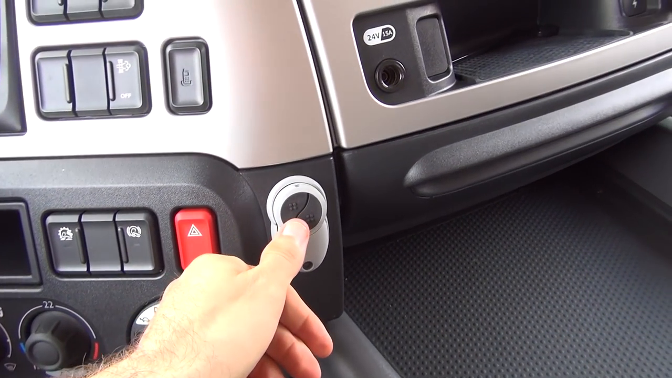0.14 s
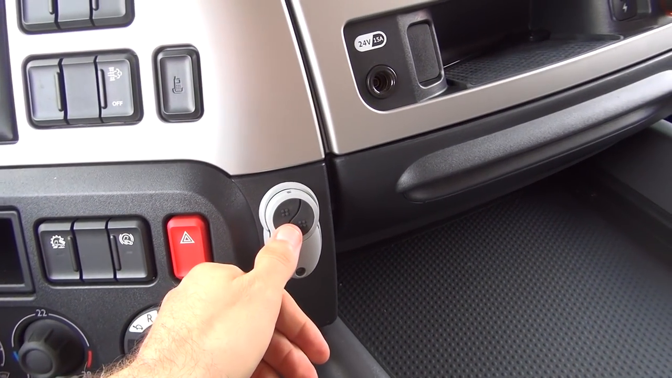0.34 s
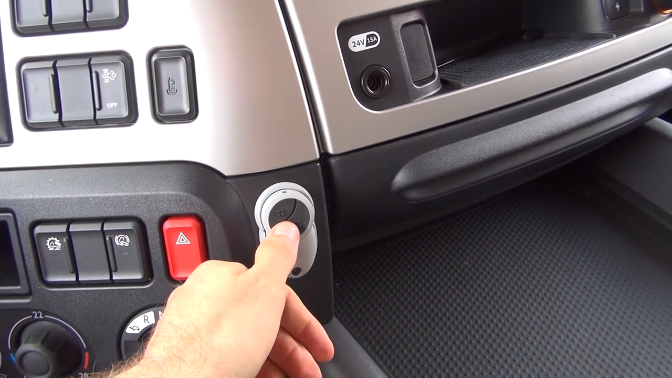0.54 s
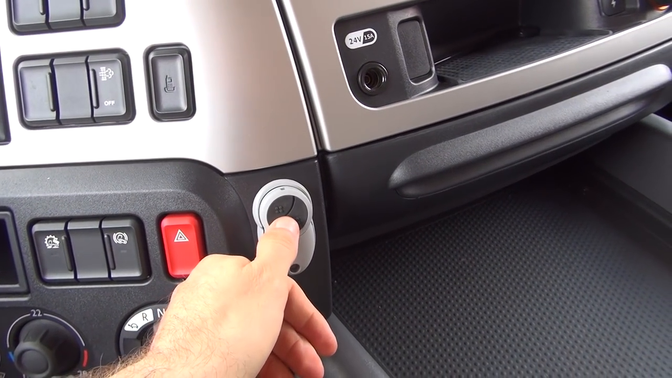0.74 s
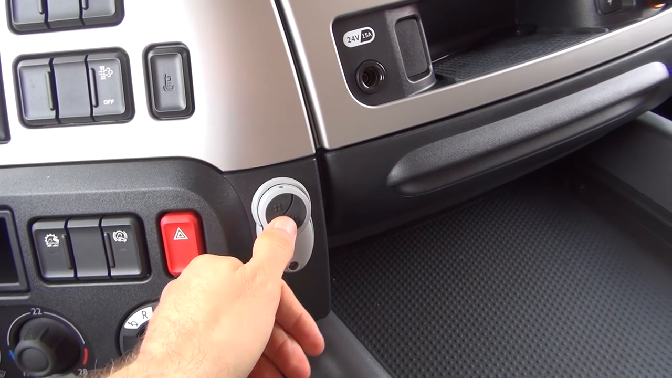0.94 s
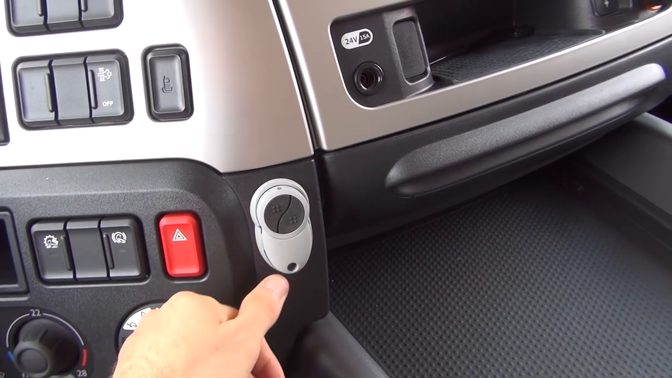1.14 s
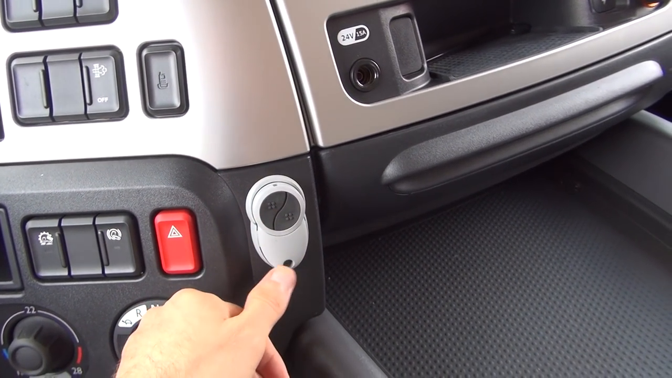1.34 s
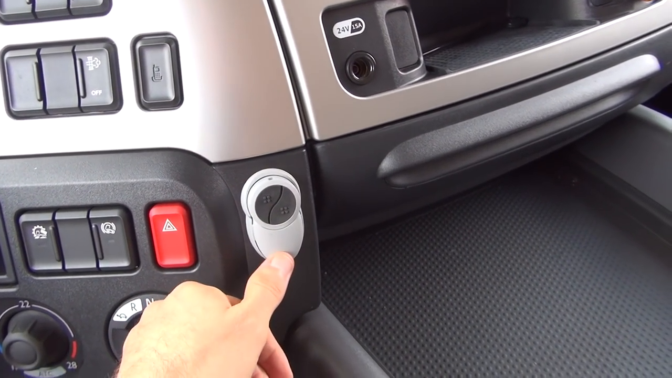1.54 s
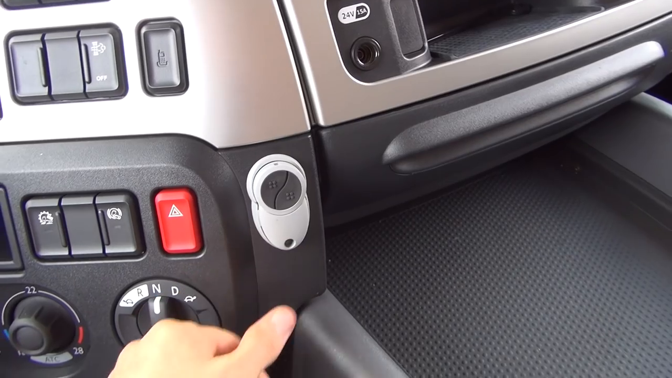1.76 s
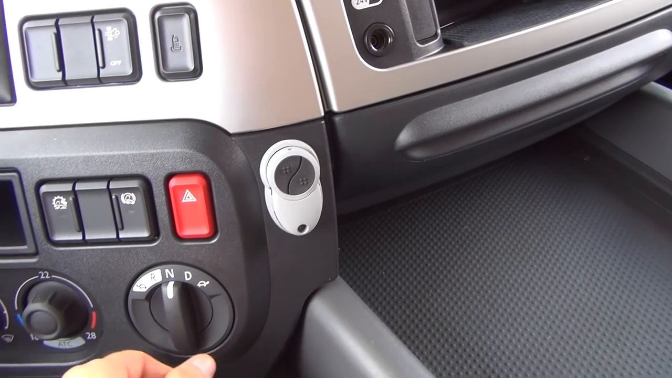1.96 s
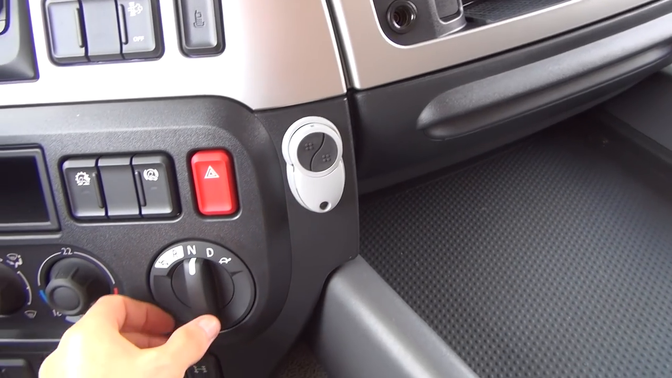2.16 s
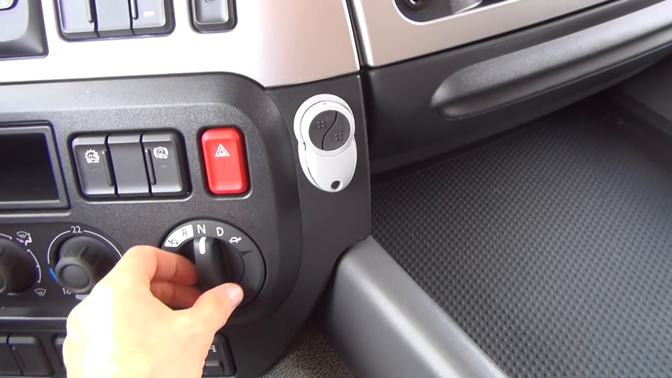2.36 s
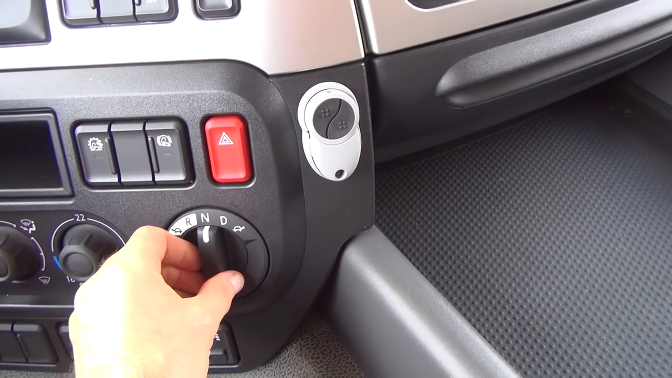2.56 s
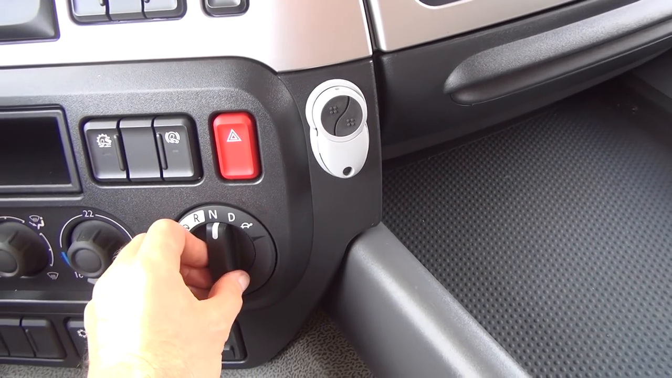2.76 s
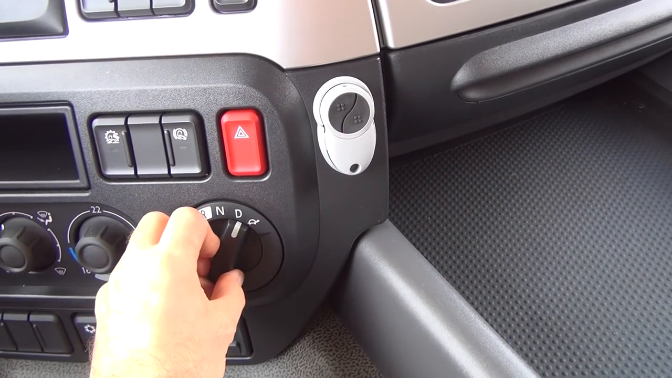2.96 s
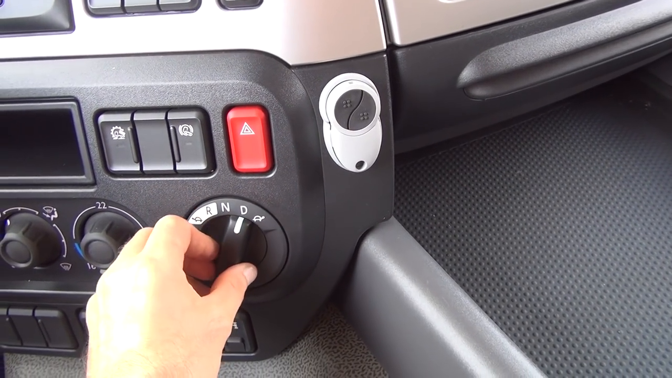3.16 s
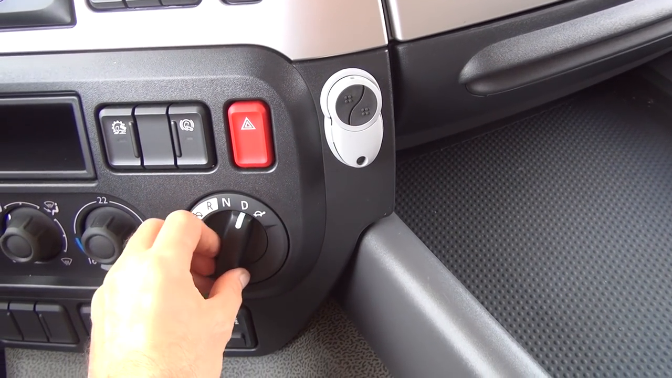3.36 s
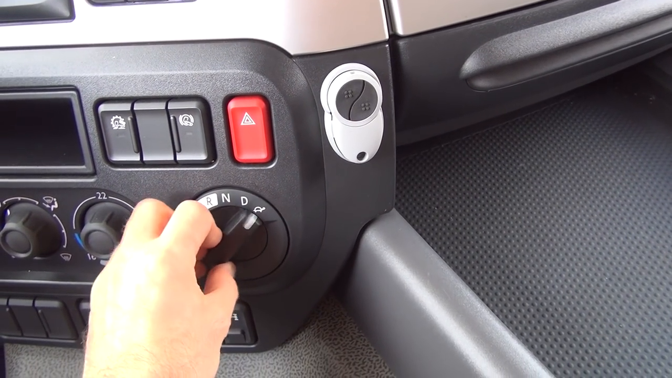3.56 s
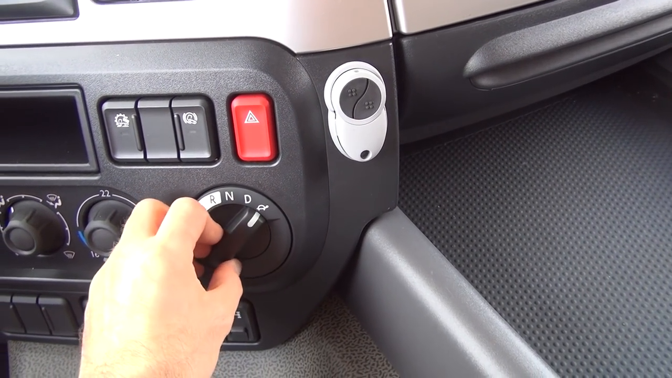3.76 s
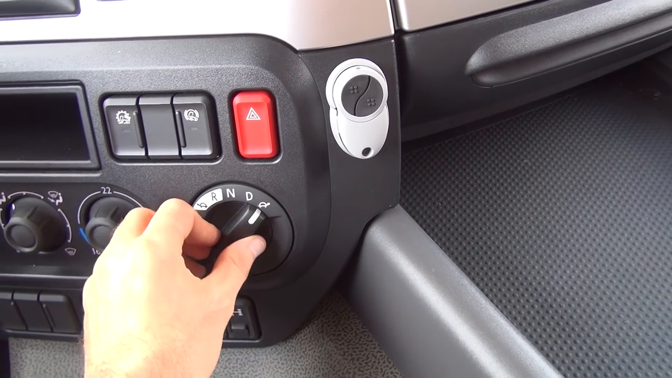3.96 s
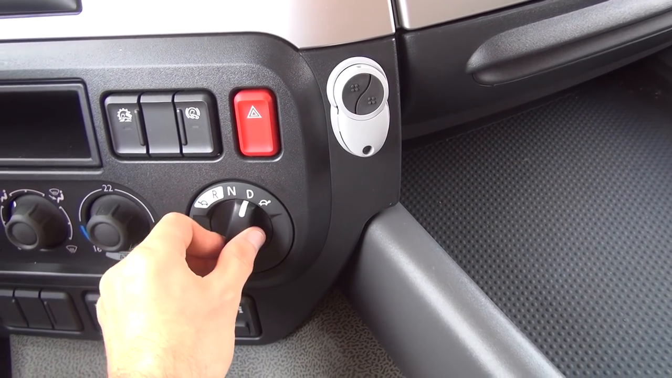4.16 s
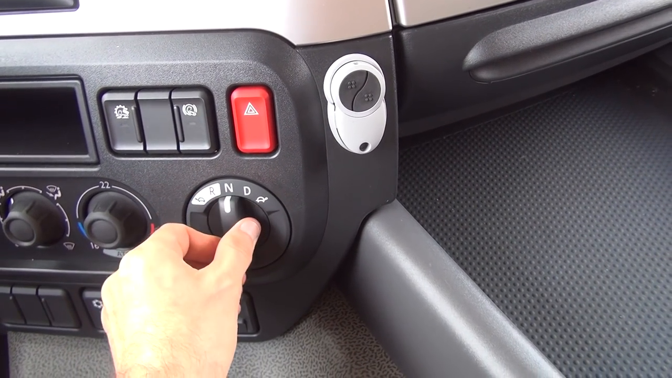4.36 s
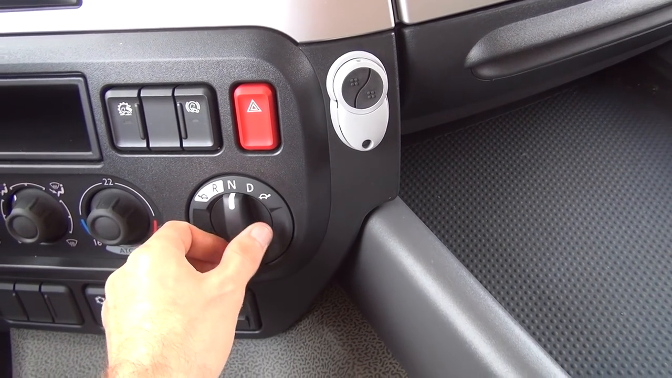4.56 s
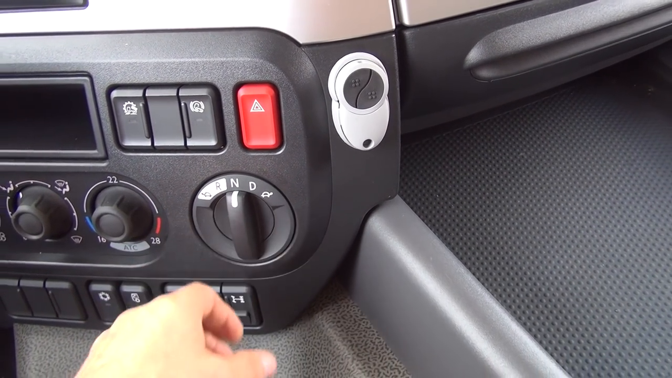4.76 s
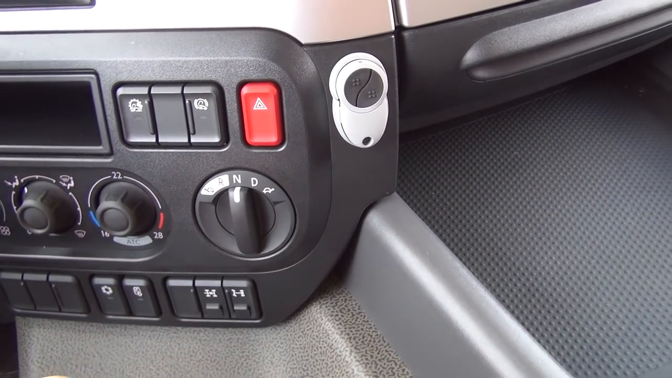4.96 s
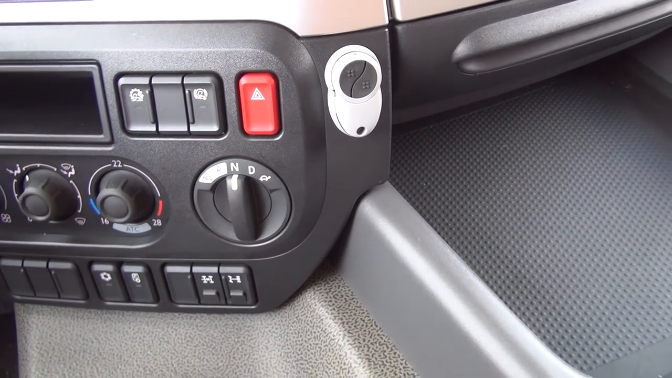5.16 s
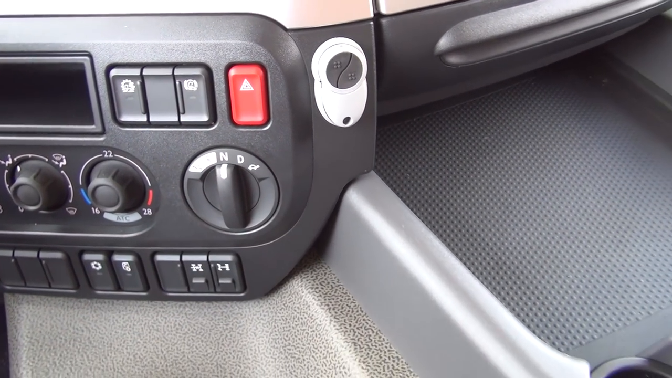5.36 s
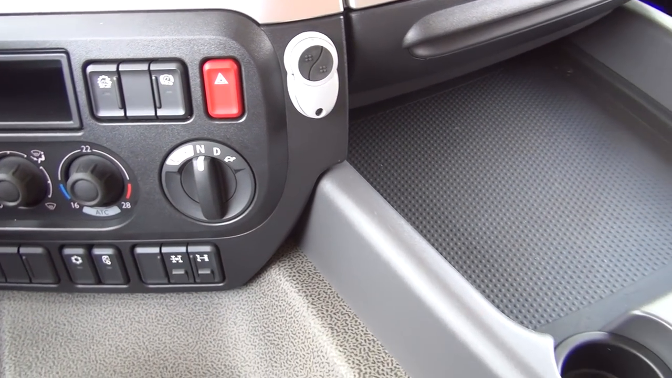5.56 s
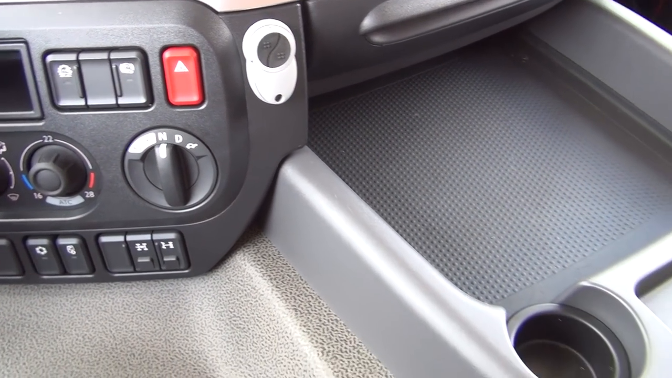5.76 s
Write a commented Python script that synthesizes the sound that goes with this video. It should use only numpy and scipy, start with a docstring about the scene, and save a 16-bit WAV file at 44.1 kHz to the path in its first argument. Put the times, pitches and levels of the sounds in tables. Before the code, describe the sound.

Inside a truck cab, a thumb presses a small plastic button pad, making a string of light, sharp clicks. Fingers then tap and scuff a rotary gear selector and turn it through four positions, each a louder, crisp snap with a brief ring from the hollow dashboard. A low hum and faint hiss continue throughout, and everything is heard close to the microphone.

```python
"""A rotary gear selector clicks through four detents in a truck cab: its spring rides up each ramp
and snaps home, exciting the modes of the knob and the hollow dashboard.
Before that, a thumb clicks a small plastic button pad; fingers tap and scuff the knob between turns.
A low hum booms in the cab throughout, and everything is heard close by, almost in mono."""
import sys
import numpy as np
from scipy import signal
from scipy.fft import rfft, irfft, next_fast_len
from scipy.io import wavfile
from scipy.ndimage import uniform_filter1d, map_coordinates

SR = 44100
rng = np.random.default_rng(int(sys.argv[2]) if len(sys.argv) > 2 else 0)


def dump_mix(stems):
    """Bounce the given channels to the path in sys.argv[1] as a 16-bit WAV at rate SR."""
    frames = np.atleast_2d(stems).T  # one column per channel
    limited = np.clip(frames, -1, 1)  # hard clip at full scale
    pcm = np.round(limited * 32767).astype(np.int16)
    wavfile.write(sys.argv[1], SR, pcm)


N = 256212
TIME = np.arange(N) / SR
AGE = np.arange(12288) / SR  # time within one short sound [s]
HZ = np.fft.rfftfreq(len(AGE), 1 / SR)

# selector steps: (time [s], snap level [dB], lead of first strike [s], knob body [dB],
# dashboard ring [dB], ring hold [s], ride up the ramp [s], ride level [dB])
DETENTS = [(2.9378, 2.5, 0.0046, -7.5, -26, 0.029, 0.068, -51),
           (3.619, 0, 0.00091, -4.5, -24, 0.013, 0.022, -57.5),
           (4.0809, 1.5, .0017, -12.5, -25, 0.029, .045, -48),
           (4.293, -0.5, 0.0014, -10, -22.5, 0.028, 0.047, -52.5)]
# modes of button shell, fascia and held knob: (frequency [Hz], bandwidth [Hz], level [dB])
SHELL_MODES = [(3450, 1500, 12), (5660, 570, 19), (7900, 690, -36)]
PANEL_MODES = [(412, 145, -2), (748, 154, 1.5), (1040, 170, -2), (1535, 300, -2.5), (2260, 960, -7),
               (2980, 1140, -10.5)]
GRIP_MODES = [(1044, 61, -5), (1893, 250, 1.5), (2690, 260, 0), (3300, 140, -1), (3860, 130, 1),
              (4660, 250, -1.5), (5880, 300, -5)]


def amp(db):
    return 10 ** (np.asarray(db) / 20)


def unit(x):
    return x / np.sqrt(np.mean(x ** 2) + 1e-20)


def peaked(x, db):
    return amp(db) * x / np.abs(x).max()


def along(points, hz):
    """Interpolate (frequency [Hz], value) points on a logarithmic axis."""
    f, v = np.transpose(points)
    return np.interp(np.log(hz + 1), np.log(f), v)


def curves(rows):
    """One value per sample for each column after the time."""
    s, *cols = np.transpose(rows)
    return [np.interp(TIME, s, c) for c in cols]


def wobble(rate):
    """A smooth random curve with `rate` knots a second."""
    return map_coordinates(rng.standard_normal(200), [TIME * rate])


def add(track, s, sound):
    """Superpose a sound at time s."""
    part = track[..., round(s * SR):][..., :sound.shape[-1]]
    part += sound[..., :part.shape[-1]]


def filtered(x, response):
    """Multiply a track's spectrum by a function of frequency."""
    m = next_fast_len(N + 8192)
    return irfft(rfft(x, m) * response(np.fft.rfftfreq(m, 1 / SR)), m)[..., :N]


def through(x, response):
    """Convolution: a short excitation passes through a body."""
    return irfft(rfft(x) * response)


def resonances(modes):
    """Modal superposition: the summed response of damped oscillators, mean power 1."""
    h = sum((-1) ** k * amp(db) * 1j * HZ * width / (f * f - HZ ** 2 + 1j * HZ * width)
            for k, (f, width, db) in enumerate(modes))
    return h / np.sqrt(np.mean(abs(h) ** 2))


def minimum_phase(spectrum):
    """Causal response of a (frequency [Hz], level [dB]) spectrum, mean power 1."""
    cepstrum = irfft(np.log(unit(amp(along(spectrum, HZ)))))
    half = len(cepstrum) // 2
    cepstrum[1:half] *= 2
    cepstrum[half + 1:] = 0
    return np.exp(rfft(cepstrum))


def rush(spectrum):
    """Coloured noise, rms 1; a side signal, weak at most frequencies but nearly as strong as the mid near 25 Hz
    and 6 kHz, sets the stereo width."""
    # stereo width: (frequency [Hz], side level [dB])
    width = [(25, 0.5), (100, -22.5), (1000, -12), (3000, -51), (6000, -2), (10000, -25)]
    mid, side = rng.standard_normal((2, N))
    mid = filtered(mid, lambda hz: amp(along(spectrum, hz)))
    side = filtered(side, lambda hz: amp(along(spectrum, hz) + along(width, hz)))
    return unit(np.array([mid + side, mid - side]))


def hum():
    """Amplitude modulation: a narrow noise band near 100 Hz and a faint tone waver over rumble."""
    # boom and rumble spectra: (frequency [Hz], level [dB])
    boom_spectrum = [(55, -42), (72, -21.5), (85, 2.5), (102, 6.5), (115, 2.5), (135, -21), (200, -59.5)]
    rumble_spectrum = [(15, -9.5), (27, 1.5), (40, -15), (50, -1.5), (65, -6.5), (130, -5), (168, 5),
                       (195, -2), (230, -6), (285, -10.5), (400, -14.5), (600, -19), (1100, -32),
                       (3500, -40), (9000, -66)]
    # boom envelope: (time [s], level [dB])
    boom_levels = [(0.0, -47), (0.16, -43.5), (2.17, -43.5), (2.33, -44), (2.38, -33.5), (2.59, -47),
                   (2.9, -39), (2.98, -45.5), (3.32, -39), (3.5, -48.5), (3.56, -41.5), (4.04, -42),
                   (4.08, -58), (4.12, -44), (4.85, -44.5), (5.05, -40), (5.68, -42), (5.81, -39)]
    # upper hum: (time [s], frequency [Hz], level [dB])
    drone_path = [(0, 218, -58.5), (1.1, 222, -56.5), (2.2, 220, -60.5), (2.9, 223, -55.5),
                  (3.8, 222, -60.5), (4.1, 247, -54.5), (5.35, 246, -59.5), (5.81, 230, -54)]
    (boom_db,), (drone_hz, drone_db) = curves(boom_levels), curves(drone_path)
    boom = rush(boom_spectrum)
    boom /= np.sqrt(np.abs(uniform_filter1d(boom[0] ** 2, SR // 7)) + 1e-6)  # even out its swells
    drone_gain = amp(drone_db + 4.3 * wobble(rate=6))
    phase = 2 * np.pi * np.cumsum(drone_hz + 1.484 * wobble(rate=8)) / SR
    drone = drone_gain * unit(np.sin(phase))
    boom *= amp(boom_db + 0.5 + 0.5 * wobble(rate=13))
    low = boom + amp(-46) * rush(rumble_spectrum) + drone + waver()
    return low * amp([[.3], [-.7]])  # slightly to the left


def waver(level_db=-62, depth_db=6.5):
    """Random modulation in time and frequency: faint patches come and go atop the rumble."""
    # upper rumble: (frequency [Hz], level [dB])
    spectrum = [(180, -24), (300, -1), (430, 0), (560, -8.5), (800, -27.5)]
    bands = signal.stft(rush(spectrum), nperseg=4096)[2]
    patches = uniform_filter1d(rng.standard_normal(bands.shape[1:]), size=3, axis=0)
    patches = unit(uniform_filter1d(patches, size=6, axis=1))
    noise = signal.istft(bands * amp(depth_db * patches), nperseg=4096)[1][:, :N]
    return amp(level_db) * unit(noise)


def hiss():
    """Broadband noise drifts slowly in level."""
    # envelope: (time [s], level [dB])
    levels = [(0, -54), (.4, -56), (5.25, -56.5), (5.81, -52.5)]
    # colour: (frequency [Hz], level [dB])
    spectrum = [(150, -38), (600, 8.5), (1500, 4.5), (3500, 1.5), (9000, -1), (15500, -0.5)]
    return amp(curves(levels)[0]) * rush(spectrum)


def whine(level_db=-68.5):
    """Beating: two close tones make a thin electronic whine."""
    return amp(level_db) * unit(np.sin(2 * np.pi * 10051 * TIME) + np.sin(2 * np.pi * 10099 * TIME))


def contact(t60, chatter):
    """Impact force: an impulse followed by exponentially decaying chatter."""
    force = chatter * rng.standard_normal(len(AGE)) * amp(-60 * AGE / t60)
    force[0] += 1
    return force / np.linalg.norm(force)


def button(touch_db=-4.5):
    """Impulse excitation: the cap touches, then snaps, ringing its shell and the panel behind."""
    # (time [s], peak level [dB], lead of touch [s], cap frequency [Hz], shell [dB], panel knock [dB])
    clicks = [(0.3006, -20, 0.00049, 10800, -6, -12.5), (0.316, -22, 0.00072, 10900, -14.5, -17),
              (0.3366, -9.5, .0005, 11300, -21, -36), (.56, -27.5, 0.00058, 10400, -7, -15),
              (0.6127, -10.5, 0.00061, 9600, -9.5, -18.5), (0.6956, -33.5, 0.00037, 8500, -1, -6.5),
              (0.716, -17, .0005, 11100, -35, -28), (0.7801, -15, 0.00056, 10600, -12.5, -15),
              (1.341, -19, 0.00064, 10300, -5, -14.5), (1.5194, -10, .0022, 10100, -9, -18),
              (1.699, -21.5, .004, 10000, -2, 4.5)]
    out, panel = np.zeros(N), resonances(PANEL_MODES)
    for s, db, lead, cap_hz, shell_db, knock_db in clicks:
        cap = resonances([(cap_hz, 5200, 0)]) * resonances([(cap_hz, 7000, 0)])
        cap /= np.sqrt(np.mean(abs(cap) ** 2))
        # thumb pressure detunes the shell a little each time
        shell = resonances([(hz * np.exp(rng.normal(0, .025)), width, level + rng.normal(0, 2))
                            for hz, width, level in SHELL_MODES])
        for when, peak_db in (s - lead, db + touch_db), (s, db):
            snap = through(contact(t60=0.0079, chatter=0.23), cap + amp(shell_db) * shell)
            knock = through(contact(t60=0.056, chatter=0.16), amp(knock_db) * panel)
            add(out, when, peaked(snap + knock, peak_db))
    return out


def spring_response():
    """Frequency response of the steel spring: narrow coil modes on a broad, bright sheen."""
    # (frequency [Hz], level [dB])
    sheen = [(500, -64), (4000, -32), (6800, -15.5), (7800, -7.5), (9000, -4), (11500, -2), (13500, -7),
             (15000, -11.5), (16500, -43)]
    # (frequency [Hz], bandwidth [Hz], level [dB])
    coil_modes = [(9070, 79, 7), (8950, 110, -11), (10680, 380, 6.5), (11800, 53, -3), (11900, 270, -9),
                  (11520, 80, -22), (13320, 180, 6)]
    return 1.12 * minimum_phase(sheen) + 0.26 * resonances(coil_modes)


def slips(grit_db=7, clump_db=2.5):
    """Stick-slip friction: clumps of tiny ticks of random size, rms 1."""
    clumps = np.repeat(rng.standard_normal(len(AGE) // 96), 96)
    ticks, grit = rng.standard_normal((2, len(AGE)))
    return unit(ticks * amp(clump_db * clumps + grit_db * grit))


def stroke(length):
    """A rounded envelope for one sliding movement."""
    return np.abs(np.sin(np.pi * AGE / length)) ** 0.12 * (AGE < length)


def sliding(strokes, modes, panel_db):
    """Friction of skin on plastic drives a bright sheen and the modes of the part and the panel."""
    out, sheen = np.zeros(N), spring_response()
    body, panel = resonances(modes), resonances(PANEL_MODES)
    for s, length, db, body_db in strokes:
        colour = sheen + amp(body_db) * body + amp(panel_db) * panel
        add(out, s, amp(db) * through(slips() * stroke(length), colour))
    return out


def thumb():
    """Friction excites the button shell as the thumb slides off."""
    # (time [s], duration [s], level [dB], shell [dB])
    slides = [(1.0, .02, -51, -1), (1.019, 0.032, -44, -4), (1.385, .025, -56, -5)]
    return sliding(slides, SHELL_MODES, panel_db=-7.5)


def knob(strikes):
    """Damped vibration: the spring snaps briefly; the hollow knob and the panel rattle on longer."""
    # struck knob: (frequency [Hz], bandwidth [Hz], level [dB])
    body_modes = [(1144, 140, -8.5), (1850, 130, -6.5), (2600, 210, -1), (3116, 130, 4.5), (3614, 220, 1.5),
                  (4930, 760, -6), (6000, 870, -9)]
    out, spring = np.zeros(N), spring_response()
    body, panel = resonances(body_modes), resonances(PANEL_MODES)
    for s, db, body_db, knock_db in strikes:
        snap = through(contact(t60=0.017, chatter=0.27), spring)
        clack = through(contact(t60=0.043, chatter=0.082), amp(body_db) * body)
        knock = through(contact(t60=0.14, chatter=0.092), amp(knock_db) * panel)
        add(out, s, peaked(snap + clack + knock, db))
    return out


def fingers():
    """Impact and friction: fingers rock the knob in its play and rub its surface."""
    # (time [s], peak level [dB], knob body [dB], panel knock [dB])
    taps = [(2.226, -37, 4, 7), (2.276, -32.5, 4, -10), (2.354, -30.5, 8, -4), (2.378, -38, 10, 1),
            (2.667, -33.5, -4, -20), (3.0897, -16, 7, -7), (3.166, -29.5, 5.5, 4), (3.765, -39.5, 8, 12),
            (4.456, -27.5, 3.5, 2.5), (4.499, -37.5, 12.5, 13)]
    # (time [s], duration [s], level [dB], knob body [dB])
    scuffs = [(2.221, .06, -55, 3.5), (2.272, 0.068, -48.5, 1), (2.372, 0.071, -56.5, -1),
              (2.806, 0.02, -51.5, -0.5), (3.077, 0.015, -44.5, 2), (3.167, 0.09, -56.5, 2),
              (3.376, .016, -55.5, 2.5), (3.488, 0.062, -54, 0), (3.866, 0.02, -51, -2),
              (4.656, 0.028, -42.5, 3)]
    return knob(taps) + sliding(scuffs, GRIP_MODES, panel_db=-6)


def ramps(slip_db=-28, rise_db_per_s=1500):
    """Sliding friction: the spring scrapes up each ramp, then swells as it races into the notch."""
    out = np.zeros(N)
    colour = spring_response() + amp(-0.5) * resonances(GRIP_MODES) + amp(-8) * resonances(PANEL_MODES)
    for s, *_, ride, ride_db in DETENTS:
        scrape = amp(ride_db) * stroke(ride)
        race = amp(slip_db - rise_db_per_s * np.abs(ride - AGE)) * (AGE < ride)
        add(out, s - ride, through(slips() * (scrape + race), colour))
    return out


def detent_snaps(first_db=-3.5, knock_db=-25.5, bounce_s=.0021, loss_db=4, dull_db=2.5):
    """Inelastic collision: the spring strikes, snaps home and bounces twice, weaker and duller."""
    strikes = []
    for s, db, lead, body_db, *_ in DETENTS:
        strikes.append((s - lead, db + first_db, body_db, knock_db))
        strikes += [(s + k * bounce_s, db - k * loss_db, body_db + k * dull_db, knock_db + k * dull_db)
                    for k in range(3)]
    return knob(strikes)


def dashboard(attack_s=0.0073, ring_t60=.14, rattle_db=1.5, shudder_db=-37, shudder_t60=0.56):
    """Structure-borne sound: each snap excites panel modes, spring rattle and a low shudder."""
    # dense panel modes and low shudder: (frequency [Hz], level [dB])
    panel_spectrum = [(120, -7.5), (220, 6.5), (330, 1), (480, -3), (680, 4.5), (1120, 0), (1450, -3),
                      (2100, 0.5), (2450, -4), (3100, 6), (3600, -0.5), (4200, 3.5), (5000, 1), (6500, 3),
                      (9000, -5)]
    shudder_spectrum = [(18, -9), (28, -1), (45, 2), (65, -5), (140, -7.5), (330, -15), (500, -28),
                        (900, -70)]
    # prominent resonances: (frequency [Hz], bandwidth [Hz], level [dB])
    ring_modes = [(587, 49, -0.5), (1144, 52, -6.5), (2130, 65, -4), (3000, 40, -10), (3070, 33, -23),
                  (3410, 103, 2), (3660, 105, 1.5), (4780, 81, -3), (5870, 60, -15)]
    out, spring = np.zeros(N), spring_response()
    panels, modes = minimum_phase(panel_spectrum), resonances(ring_modes)
    for s, _, lead, _, ring_db, hold, *_ in DETENTS:
        # the ring after each snap holds level briefly, then fades
        decay = 1 / np.sqrt(1 + amp(60 * (AGE - hold) / ring_t60) ** 2)
        swell = (1 - np.exp(-AGE / attack_s)) * decay
        panel_drive, mode_drive, spring_drive = rng.standard_normal((3, len(AGE))) * swell
        ring = 0.98 * through(panel_drive, panels) + 0.52 * through(mode_drive, modes)
        rattle = amp(rattle_db) * through(spring_drive, spring)
        shudder = unit(through(rng.standard_normal(len(AGE)), minimum_phase(shudder_spectrum)))
        shudder *= amp(shudder_db - 60 * AGE / shudder_t60) * (1 - np.exp(-AGE / 0.038))
        add(out, s - lead, amp(ring_db) * (ring + rattle) + shudder)
    return out


def cab(x, wet_db, bass_db, treble_db):
    """Reverberation: the padded cab adds a short, dull tail that varies as hand and listener move."""
    # (frequency [Hz], reverberation time [s])
    t60s = [(150, 0.11), (1000, 0.15), (3500, 0.16), (9000, 0.15), (15000, 0.051)]
    spectrum = [(500, bass_db), (4000, -1.2), (7500, -1.2), (10500, treble_db), (16000, treble_db)]
    out, hop = np.zeros((2, N)), SR // 4
    for start in range(0, N, hop):
        hz, t, bands = signal.stft(rng.standard_normal((2, SR // 4)), SR, nperseg=256)
        colour = amp(along(spectrum, hz))[:, None]
        decay = amp(-60 * t / along(t60s, hz)[:, None]) * (1 - np.exp(-t / 0.00075))
        mid, side = signal.istft(bands * colour * decay, SR, nperseg=256)[1]
        tail = (mid + 0.0093 * np.array([side, -side])) / np.linalg.norm(mid)
        add(out, start / SR, signal.fftconvolve(x[None, start:start + hop], tail, axes=1))
    return x + amp(wet_db) * out


def ports(x):
    """Phase difference: the two microphone ports hear nearly alike, except around 6.6 kHz."""
    # quadrature side signal: (frequency [Hz], level [dB])
    side_spectrum = [(300, -19), (1000, -24), (2500, -30), (3600, -30.5), (4700, -20.5), (5700, -9),
                     (6600, -2), (8000, -21), (10000, -27), (13000, -42)]
    side = filtered(x.mean(0), lambda hz: 1j * amp(along(side_spectrum, hz)))
    return x + np.array([side, -side])


def scene():
    """Superposition: button pad and selector sound in the cab, over its hum, hiss and whine."""
    pad = cab(button() + thumb(), wet_db=-8, bass_db=8, treble_db=-5)
    handling = detent_snaps() + ramps() + fingers()
    selector = cab(handling, wet_db=-7, bass_db=10.5, treble_db=-1.5) + dashboard()
    return ports(pad + selector) + hum() + hiss() + whine()


def record(dry, cutoff_hz=15900):
    """Soft saturation rounds the tallest peaks; a steep low-pass limits the bandwidth."""
    rounded = dry / (1 + np.abs(dry) ** 6) ** (1 / 6)
    return filtered(rounded, lambda hz: 1 / np.sqrt(1 + (hz / cutoff_hz) ** 120))


dry = scene()
out = record(dry)
dump_mix(out)
```